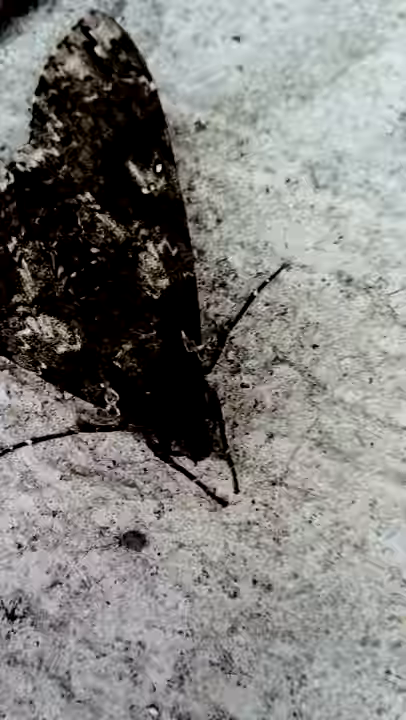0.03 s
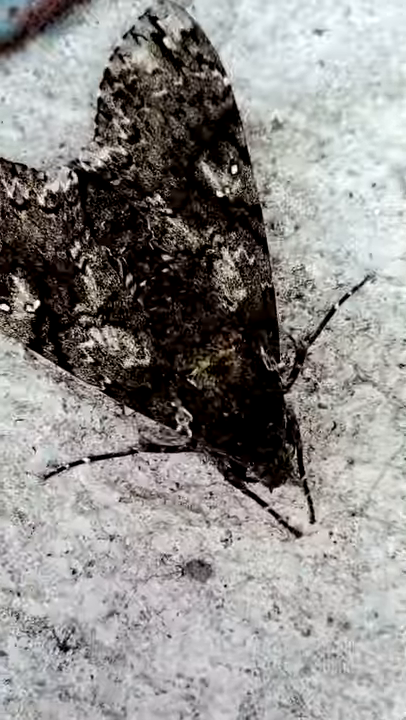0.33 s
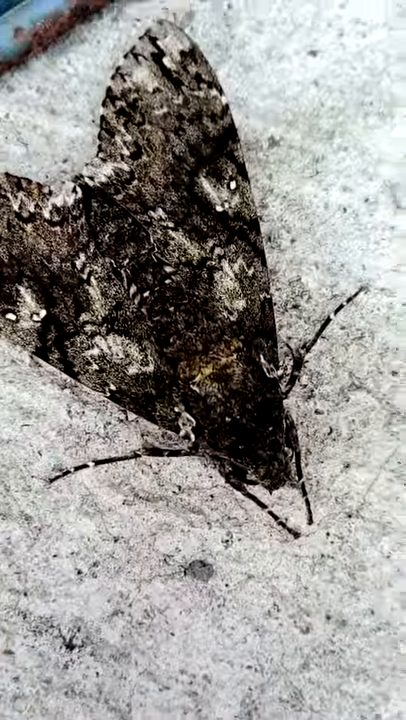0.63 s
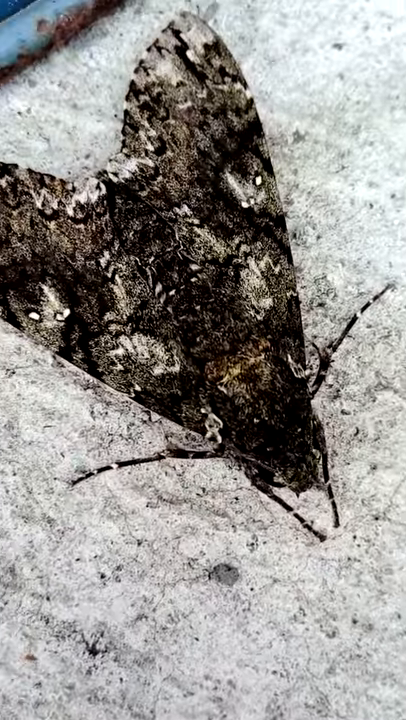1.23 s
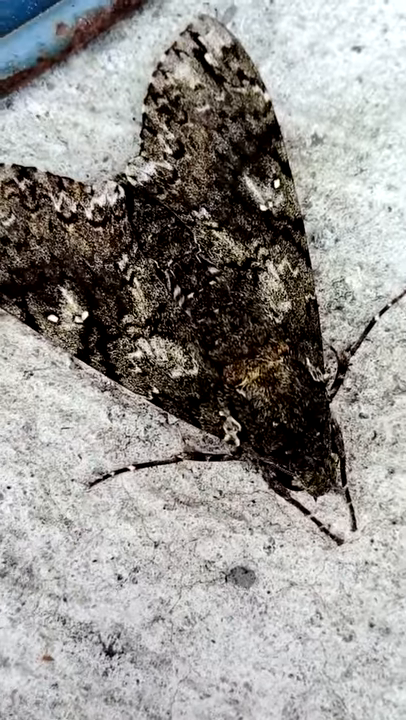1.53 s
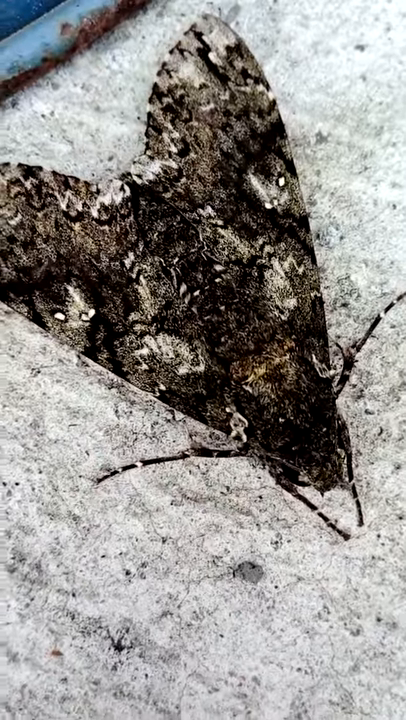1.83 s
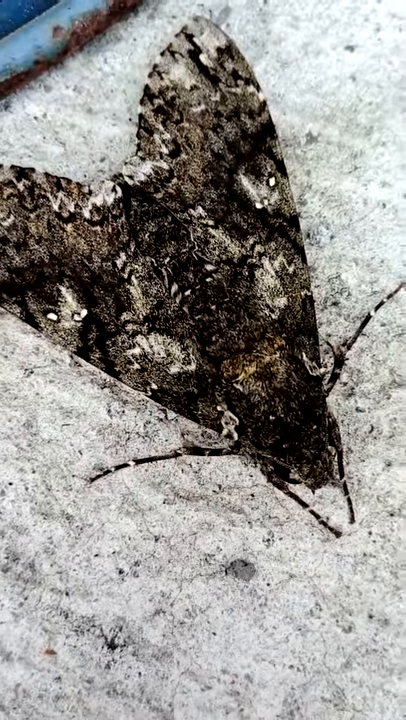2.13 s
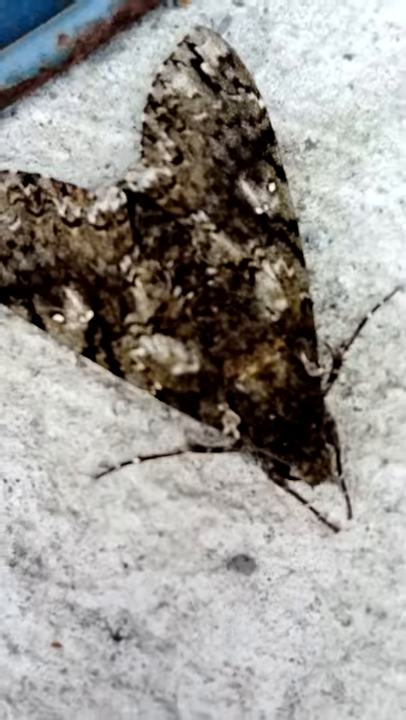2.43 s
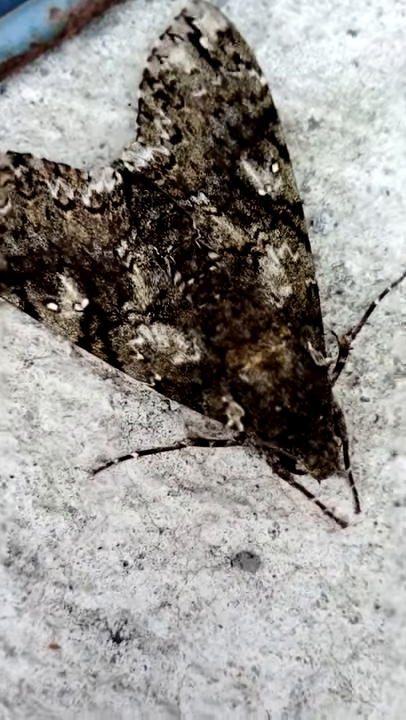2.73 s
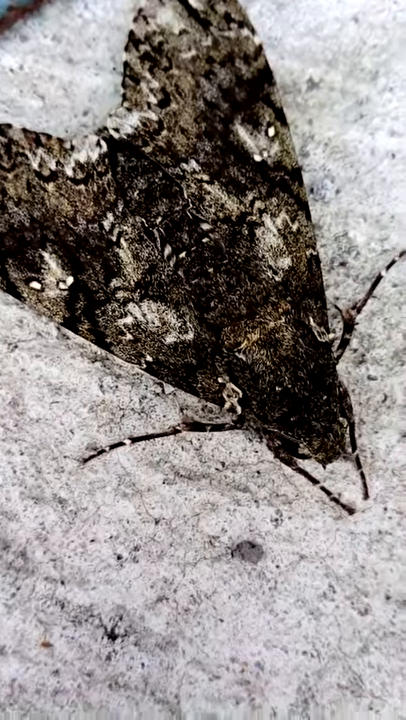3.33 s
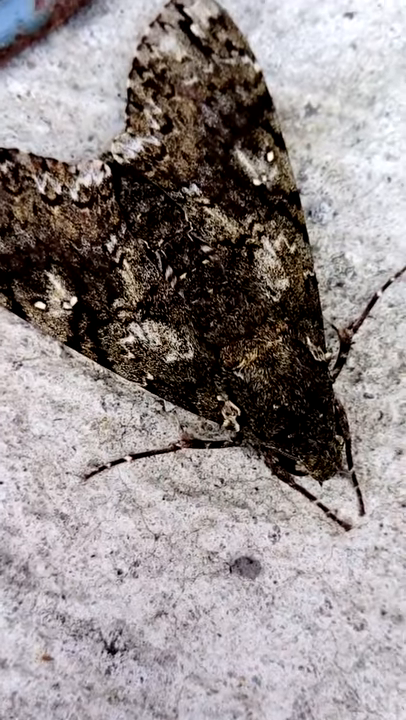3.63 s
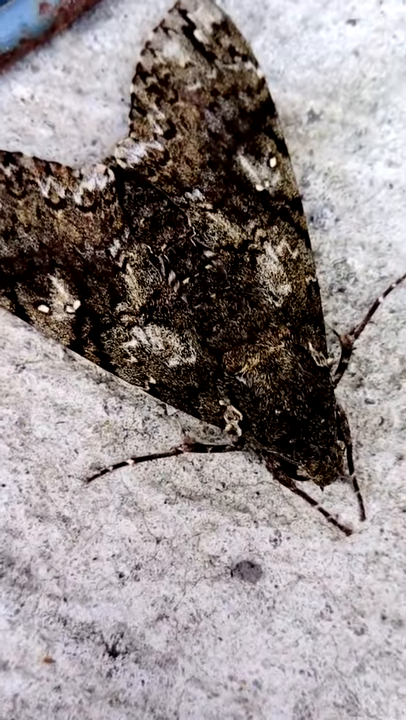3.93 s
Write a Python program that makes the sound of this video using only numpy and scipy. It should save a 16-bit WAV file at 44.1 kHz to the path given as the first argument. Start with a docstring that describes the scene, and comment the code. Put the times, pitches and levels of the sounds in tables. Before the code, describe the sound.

A steady low hum with a rush of fan air, like an outdoor cooling unit, fades in. Faint chirps come from far off. Then one dry click sounds close to the microphone, followed by a soft lens whirr.

```python
"""A steady hum fades in: a mains-driven machine, probably an outdoor cooling unit.
Its motor makes the tones, while its fan stirs the air into a rumble and a rush.
A faint run of chirps comes from far off. Then, close by, there is one dry click
and the soft whirr of a lens focusing."""
import sys
import numpy as np
from scipy import signal
from scipy.fft import rfft, irfft
from scipy.io import wavfile

SR = 44100
rng = np.random.default_rng(int(sys.argv[2]) if len(sys.argv) > 2 else 0)


def pcm_store(signal):
    """Save signal as 16-bit PCM."""
    levels = np.round(np.clip(np.atleast_2d(signal), -1, 1) * 32767)
    wavfile.write(sys.argv[1], SR, levels.astype(np.int16).T)


N = 176400

# the middle and strength of each distant chirp: t/s, relative level/dB
CHIRP_NOTES = [(.70, -54), (0.743, -56), (.795, -59), (.845, -55), (0.906, -56), (.965, -58), (1.04, -53),
               (1.225, -55), (1.292, -54), (1.358, -53), (1.428, -55), (1.50, -61), (1.565, -59),
               (1.635, -54), (1.709, -52.5)]
# tone colour of the focusing lens: f/Hz, relative level/dB
WHIRR_SPECTRUM = [(2000, -31.5), (3500, -7), (4080, 1), (4550, -10), (5050, 2.5), (5350, -3), (5800, -10),
                  (7200, -42.5), (9000, -61)]
# tone colour of the ring after the click: f/Hz, relative level/dB
RING_SPECTRUM = [(3000, -16), (6400, 3), (7200, -12), (8500, -40)]
# tone colour of the fan's rumble: f/Hz, relative level/dB
RUMBLE_SPECTRUM = [(10, -19.5), (25, -23), (43, -29.5), (55, -14), (68, -17.5), (90, -6), (145, -5.5),
                   (180, -0.5), (222, -1), (255, -14.5), (295, -14), (345, -15), (400, -14), (470, -20),
                   (520, -25.5), (800, -41), (2000, -84.5)]
# tone colour of the rushing air: f/Hz, relative level/dB
RUSH_SPECTRUM = [(200, -10), (560, -1), (700, -1), (830, -3.5), (1000, 1), (1200, 0), (1500, 1),
                 (1750, -6.5), (2060, -7), (2160, -15.5), (2260, -14.5), (2420, -6.5), (2700, -7),
                 (2950, -12.5), (3400, -16), (4050, -11), (4350, -13.5), (4920, -10), (5600, -20.5),
                 (5950, -20.5), (7000, -39), (8000, -49), (15000, -52.5)]
# tones of the motor's hum: multiple of the mains frequency, relative level/dB
HUM_TONES = [(1, -60.5), (2, -37), (6, -53), (8, -66), (16, -67), (18, -58), (19, -65.5), (20, -56),
             (22, -66.5), (42, -70)]
# how the thin whine swells and sinks: t/s, level/dB
WHINE_LEVELS = [(0, -67.5), (1.4, -63), (2.1, -70.5), (3.0, -65.5), (3.55, -60), (3.87, -57), (3.93, -63)]
# tones of the turning parts: f/Hz, level/dB, unsteadiness from 0 to 1
SHAFT_TONES = [(20, -60.5, .3), (30.2, -62, .2), (56.6, -63.5, .3), (186, -42, .85), (242.1, -44, .6),
               (259.4, -43, 0.42)]


def undb(db):
    """Turns decibels into a number to multiply by."""
    return 10 ** (np.asarray(db) / 20)


def noise(points):
    """Noise of strength 1, coloured by a table of f/Hz, level/dB."""
    hz, db = np.array(points, float).T
    f = np.maximum(np.fft.rfftfreq(N, 1 / SR), 1)
    colour = undb(np.interp(np.log(f), np.log(hz), db))
    y = irfft(rfft(rng.standard_normal(N)) * colour, N)
    return y / y.std()


def low_pass(x, hz, order):
    """Dulls the sound above hz."""
    return signal.sosfilt(signal.butter(order, min(hz, SR / 2 - 1), fs=SR, output="sos"), x)


def walk(rate):
    """A random drift of typical size 1, changing up to about rate times a second."""
    f = np.fft.rfftfreq(N, 1 / SR)
    y = irfft(rfft(rng.standard_normal(N)) * (f > 0) / (1 + (f / rate) ** 4), N)
    return y / y.std()


def tone(t, hz, unsteady, rate=4):
    """A tone of strength 1 whose unsteady share wanders in level and phase."""
    share = np.clip(unsteady, 0, 1)
    swing = np.sqrt(2 * (1 - share ** 2)) + share * (walk(rate) + 1j * walk(rate))
    return np.real(swing * np.exp(2j * np.pi * (hz * t + rng.random())))


def distant_chirps(t):
    """Short, slightly raspy falling notes, heard at two and three times their base pitch."""
    base_hz, fall_hz_per_s, width_s = 2044, 1000, 0.006
    rasp = 0.34 * walk(rate=150)  # a fast wobble of the phase roughens the notes
    out = np.zeros(N)
    for middle_s, db in CHIRP_NOTES:
        near = np.abs(t - middle_s) < 5 * width_s
        offset = t[near] - middle_s
        hz = base_hz * (1 + 0.0098 * rng.standard_normal())
        phase = 2 * np.pi * (hz * offset - fall_hz_per_s * offset ** 2 / 2) + rasp[near]
        note = np.sin(2 * phase) + undb(-16.5) * np.sin(3 * phase)
        swell = np.exp(-(offset / width_s) ** 2 / 2)
        out[near] += undb(db + 3) * swell * note
    return out


def lens_whirr(t):
    """A lens moves into focus close by, making a brief, soft band of noise."""
    start_s, end_s, ramp_s = 2.41, 2.70, 0.03
    on_off = np.clip(np.minimum(t - start_s, end_s - t) / ramp_s, 0, 1)
    return undb(-57) * on_off * noise(WHIRR_SPECTRUM)


def dry_click(t):
    """A tick and a tiny thud die away almost at once, leaving a faint high ring."""
    start_s, ring_decay_s = 2.2797, 0.018
    age = np.maximum(t - start_s, 0)

    def dying_tone(hz, decay_s):
        return np.sin(2 * np.pi * hz * age) * np.exp(-age / decay_s)

    tick = undb(-21.5) * dying_tone(hz=5100, decay_s=0.00022)
    thud = undb(-24) * dying_tone(hz=500, decay_s=0.0004)
    ring = undb(-59.5) * (t > start_s) * np.exp(-age / ring_decay_s) * noise(RING_SPECTRUM)
    return low_pass(tick - thud, hz=5950, order=6) + ring


def fan():
    """Air swirls in the housing with a low rumble and an even rush; both flutter a little."""
    rumble = noise(RUMBLE_SPECTRUM) * undb(-34.5 + 0.47 * walk(rate=12))
    rush = noise(RUSH_SPECTRUM) * undb(-46 + 0.64 * walk(rate=11))
    return rumble + rush


def motor(t):
    """Mains power makes the motor hum and whine; its turning parts add less steady tones."""
    mains_hz = 60
    hum = sum(undb(db) * tone(t, multiple * mains_hz, unsteady=0.092) for multiple, db in HUM_TONES)
    whine_db = np.interp(t, *np.array(WHINE_LEVELS).T)
    whine = undb(whine_db) * tone(t, 40 * mains_hz, unsteady=0.22)
    shaft = sum(undb(db) * tone(t, hz, unsteady) for hz, db, unsteady in SHAFT_TONES)
    waver = undb(-0.5 + walk(rate=2))  # the hum drifts by about 1 dB
    return hum * waver + whine + shaft


def scene():
    """The running machine and the three small sounds, mixed into one channel."""
    t = np.arange(N) / SR
    return (motor(t) + fan() + distant_chirps(t) + dry_click(t) + lens_whirr(t))[None]


def record(dry):
    """Fades the sound in and cuts off the highest treble."""
    fade_start_s, fade_s, top_hz = 0.071, 0.27, 15700
    t = np.arange(N) / SR
    fade_in = np.clip((t - fade_start_s) / fade_s, 0, 1) ** 0.87
    treble_cut = signal.ellip(8, 0.2, 70, top_hz, fs=SR, output="sos")
    return signal.sosfilt(treble_cut, dry * fade_in)


dry = scene()
out = record(dry)
pcm_store(out)
```